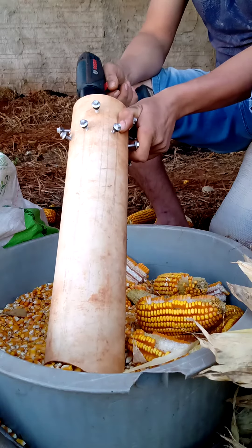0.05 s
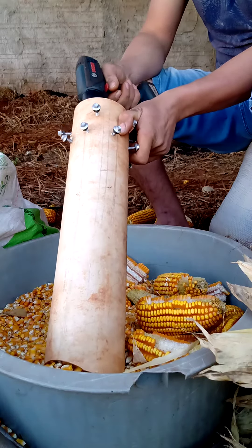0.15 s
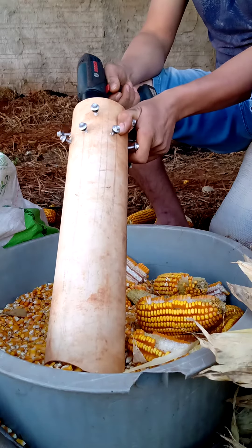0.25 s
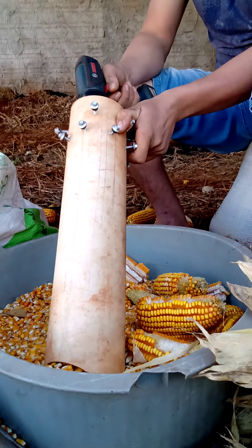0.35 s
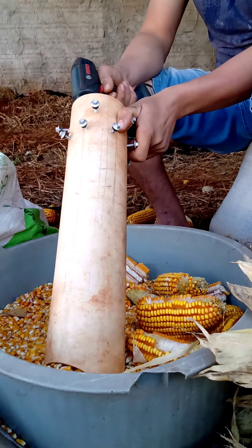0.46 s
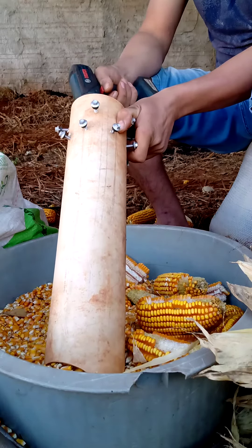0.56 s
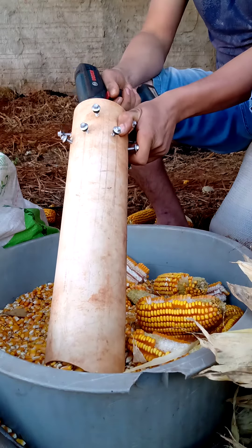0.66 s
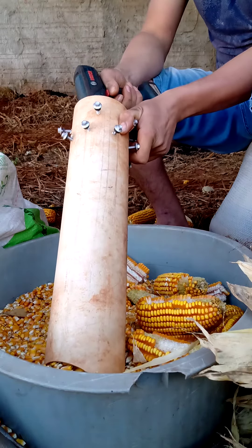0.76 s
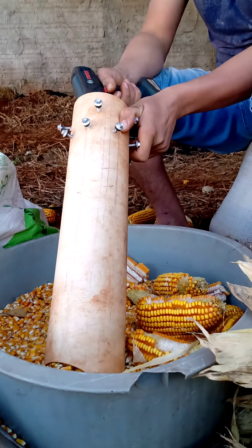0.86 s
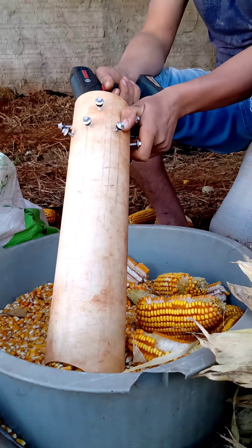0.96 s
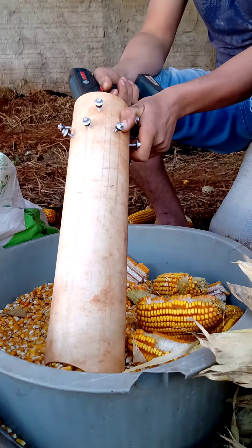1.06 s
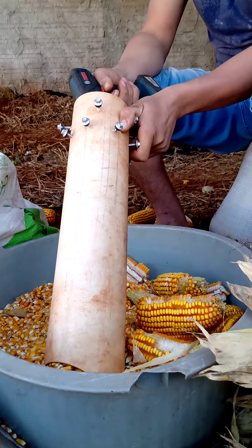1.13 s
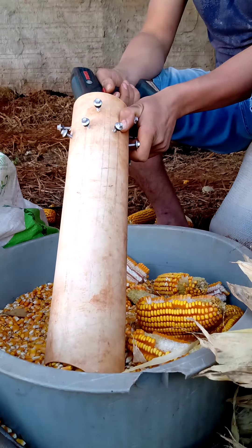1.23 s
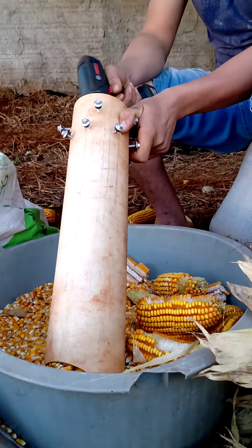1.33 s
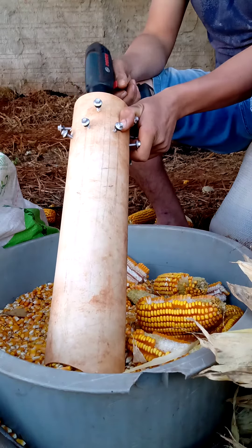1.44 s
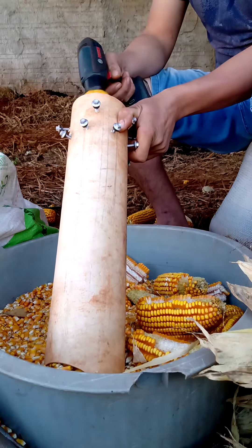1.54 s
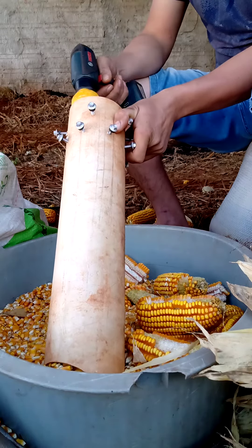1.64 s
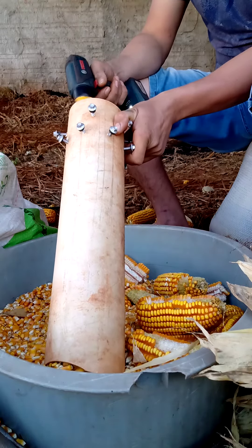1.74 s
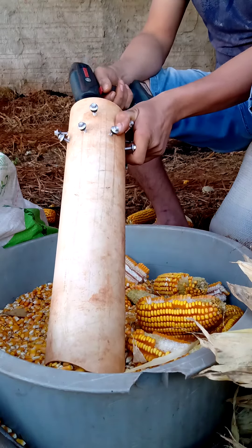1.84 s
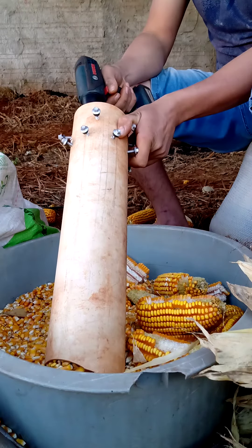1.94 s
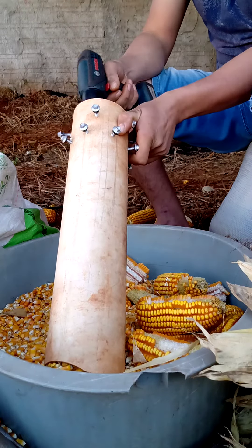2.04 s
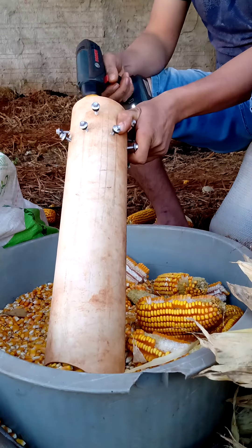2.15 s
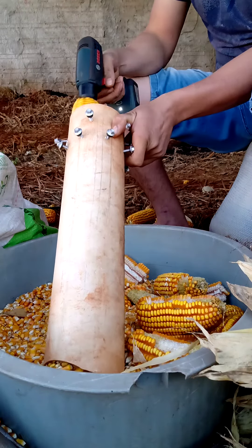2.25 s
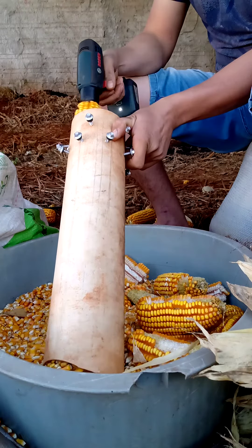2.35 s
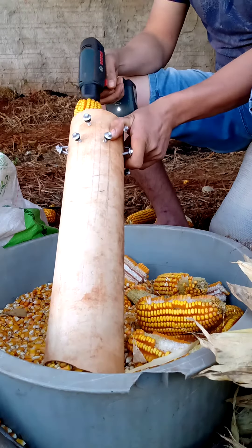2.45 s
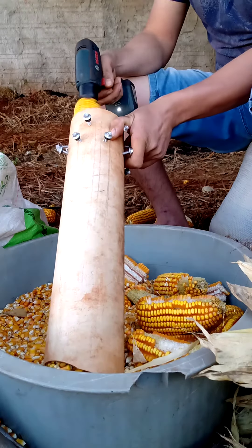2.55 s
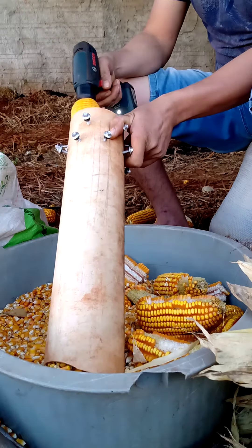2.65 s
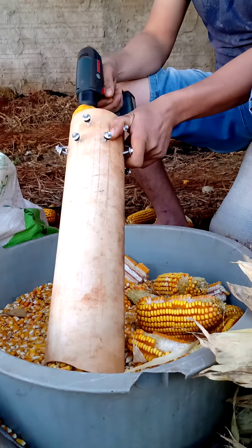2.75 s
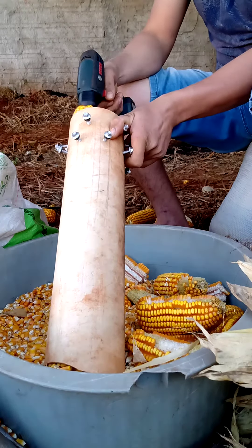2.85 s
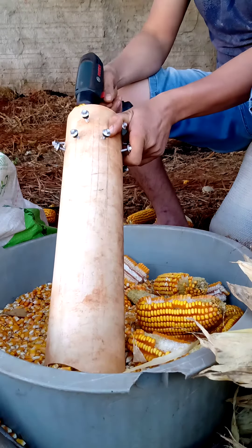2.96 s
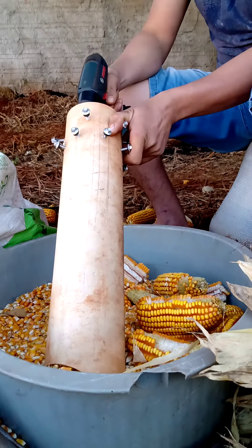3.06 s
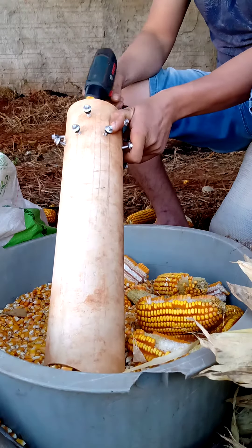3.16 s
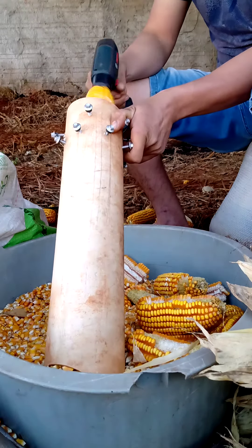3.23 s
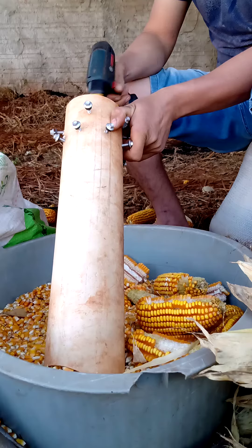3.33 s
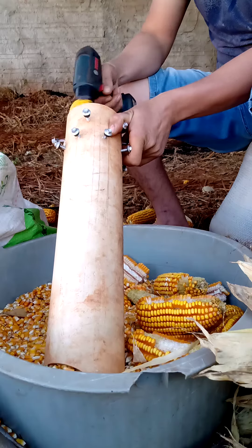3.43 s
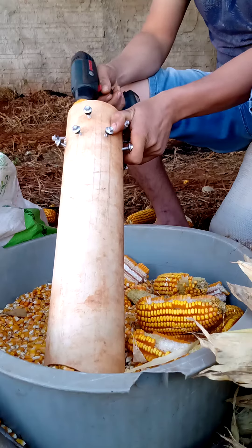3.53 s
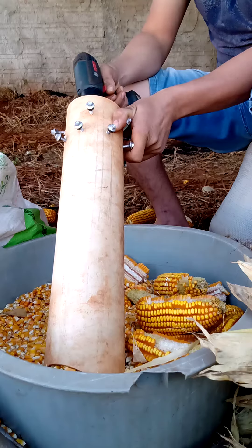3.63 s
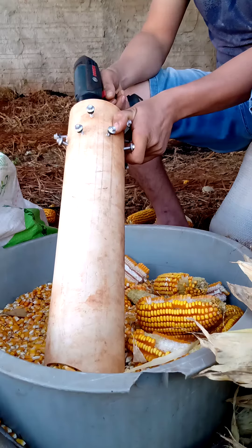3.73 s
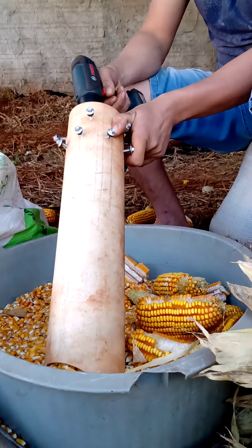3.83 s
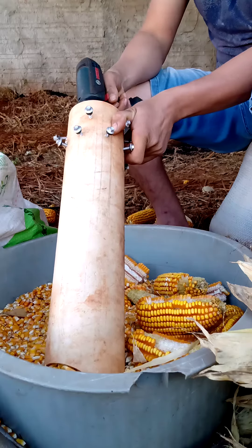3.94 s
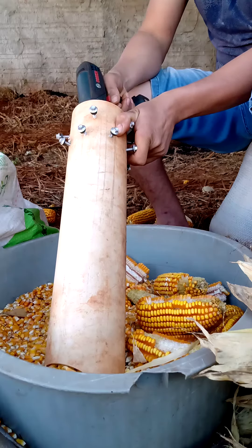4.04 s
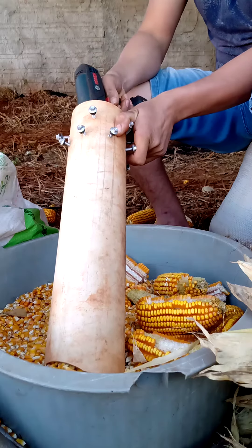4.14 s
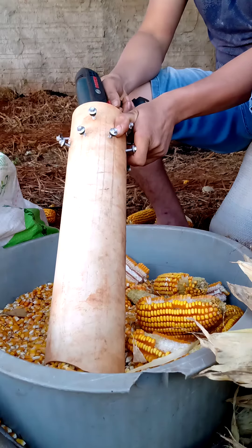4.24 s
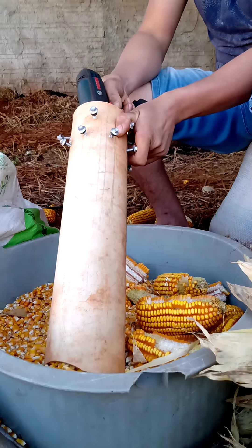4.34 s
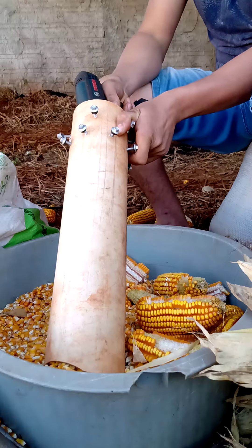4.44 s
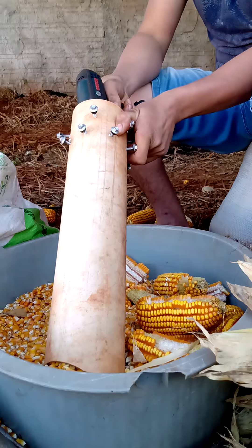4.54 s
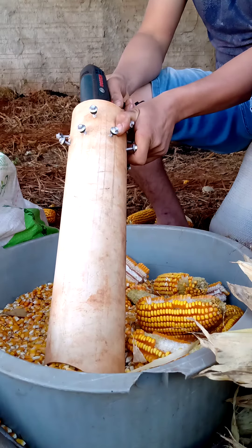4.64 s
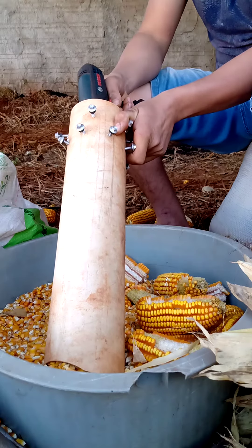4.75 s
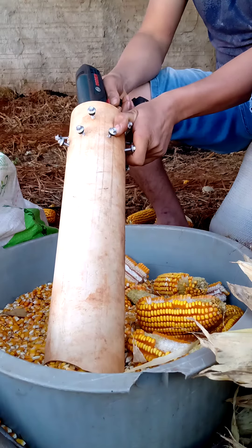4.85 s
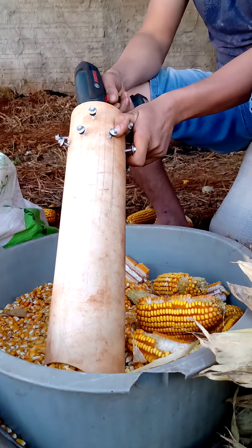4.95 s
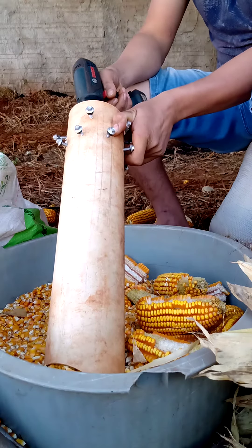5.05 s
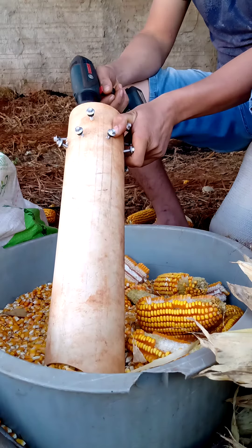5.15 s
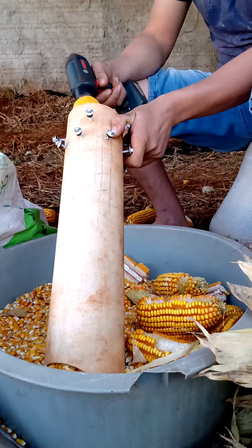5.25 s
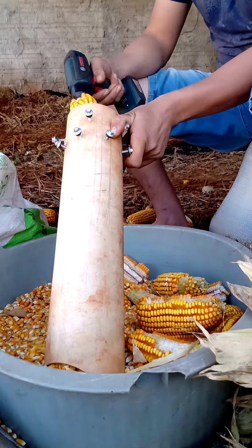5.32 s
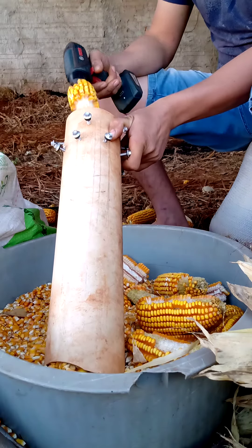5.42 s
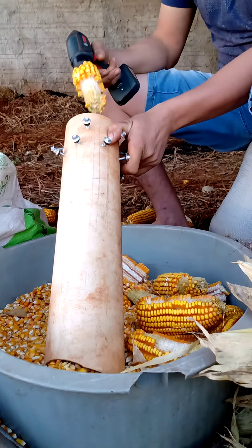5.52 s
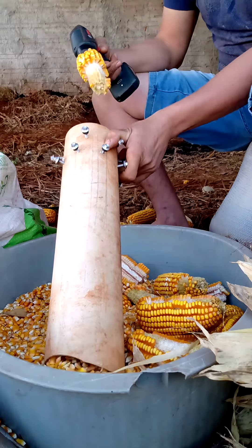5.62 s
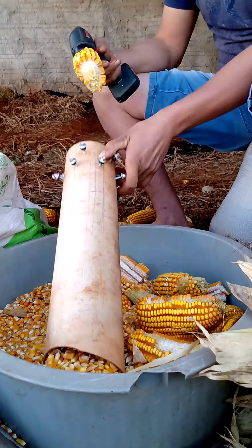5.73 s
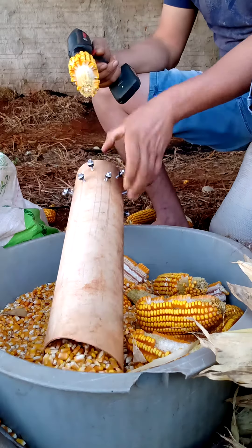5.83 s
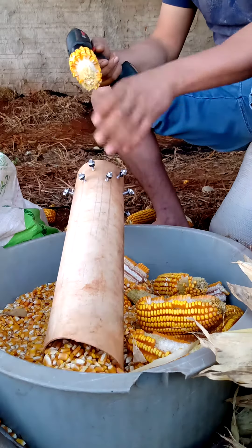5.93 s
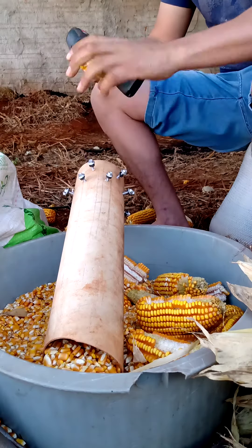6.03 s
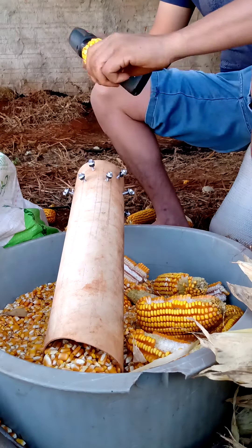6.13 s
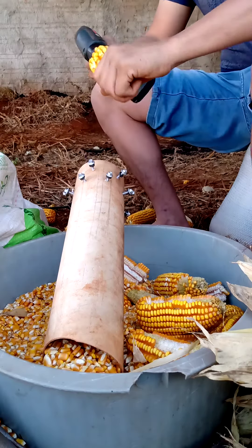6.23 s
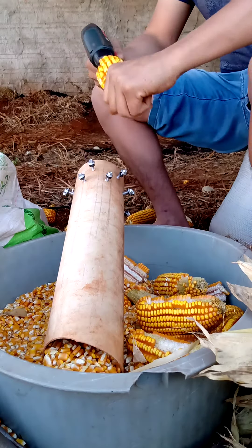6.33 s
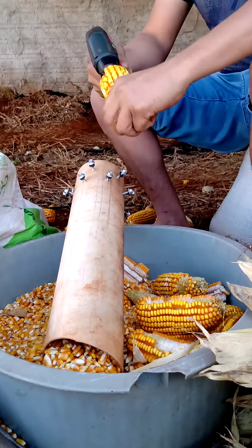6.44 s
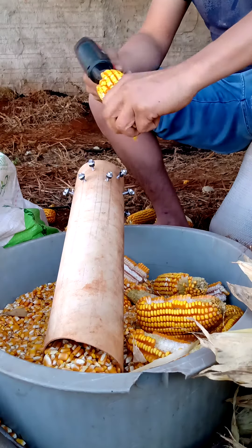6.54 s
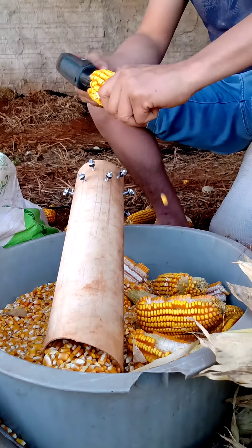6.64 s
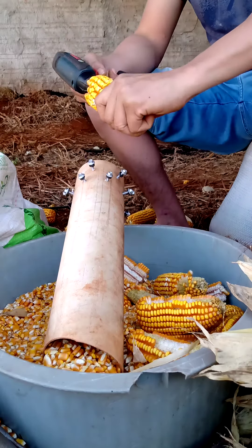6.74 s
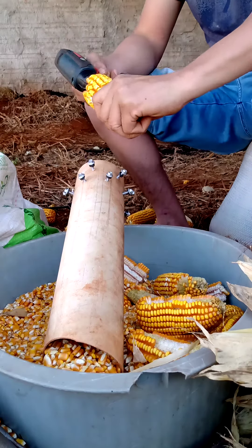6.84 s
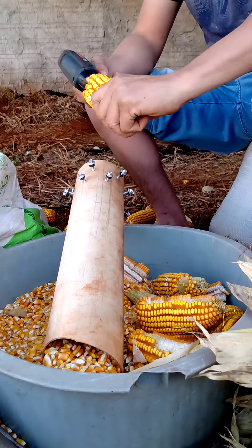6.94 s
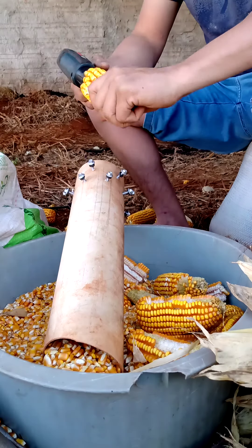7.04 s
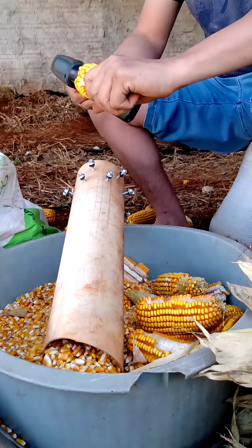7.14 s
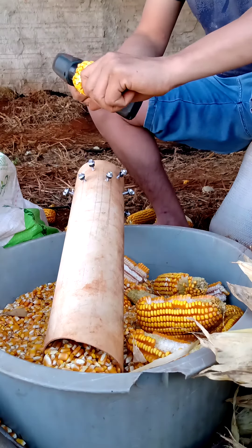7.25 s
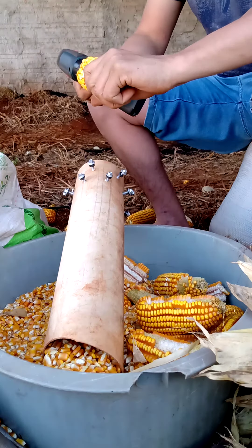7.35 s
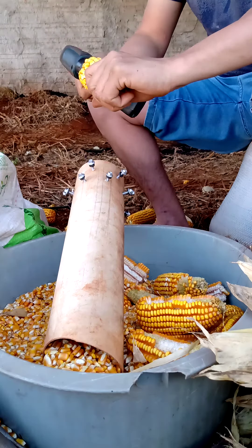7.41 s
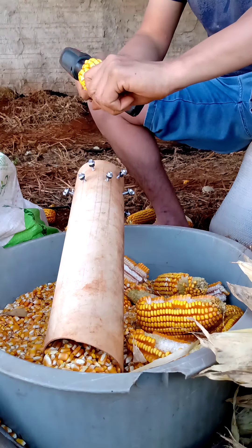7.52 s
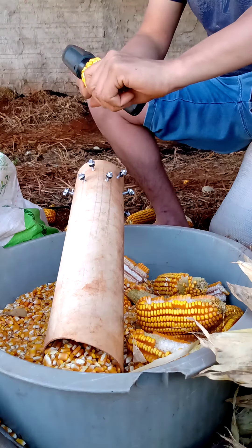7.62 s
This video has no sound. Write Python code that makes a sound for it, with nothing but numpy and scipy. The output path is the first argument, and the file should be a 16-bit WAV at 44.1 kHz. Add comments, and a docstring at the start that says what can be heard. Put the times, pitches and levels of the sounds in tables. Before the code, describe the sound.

Kernels snap and clatter against bolts under a high motor whirr, then the motor cuts, a pipe thumps down, and handling clicks lead to a restart.

```python
"""A motor whirrs and whines while kernels crack and rattle: a drill spins an ear of corn in a bolted pipe.
The motor is shaped noise with sine tones; torn kernels and pipe are resonators struck by impulses.
The drill stops, the pipe drops into a tub of damped modes, and short noise bursts tick and click.
The motor then starts again with gliding tones; a faint outdoor hush of coloured noise lies beneath."""
import sys
import numpy as np
from scipy import signal
from scipy.fft import rfft, irfft
from scipy.io import wavfile

SR = 44100
rng = np.random.default_rng(int(sys.argv[2]) if len(sys.argv) > 2 else 0)


def dump(signal):
    """Clip the signal to [-1, 1] and save it as 16-bit WAV at the path in sys.argv[1]."""
    limited = np.clip(np.atleast_2d(signal).T, -1, 1)
    pcm = np.round(limited * 32767).astype(np.int16)
    wavfile.write(sys.argv[1], SR, pcm)


N = 338688


def from_db(db):
    """Decibel law: 20 dB is a tenfold change of amplitude."""
    return 10 ** (np.asarray(db) / 20)


def rms_one(x):
    """Normalisation: unit root-mean-square amplitude."""
    return x / np.sqrt(np.mean(x ** 2) + 1e-20)


def in_time(rows, outside=None):
    """Linear interpolation: the columns of a table become curves over all samples."""
    seconds, *columns = np.transpose(rows)
    t = np.arange(N) / SR
    return [np.interp(t, seconds, column, outside, outside) for column in columns]


def at_hz(points):
    """Log-frequency interpolation: a spectrum table is read on the FFT grid."""
    table_hz, values = np.array(points).T
    grid_hz = np.maximum(np.arange(N // 2 + 1) * SR / N, 1)
    return np.interp(np.log(grid_hz), np.log(table_hz), values)


def colour(x, spectrum):
    """Spectral filtering: each frequency is weighted by a table of dB against Hz."""
    return irfft(rfft(x) * from_db(at_hz(spectrum)), N)


def drift(rate_hz):
    """Low-passed random process: a slow wander of rms 1."""
    r = np.exp(-2 * np.pi * rate_hz / SR)
    noise = rng.standard_normal(N + SR)
    settled = signal.lfilter([1], [1, -2 * r, r * r], noise)[SR:]
    return rms_one(settled)


def linger(x, seconds):
    """Exponential relaxation: each impulse dies away with this time constant."""
    return signal.lfilter([1], [1, -np.exp(-1 / (seconds * SR))], x)


def resonate(x, hz, width_hz):
    """Damped resonance: a unit click rings at one frequency with height 1."""
    r, w = np.exp(-np.pi * width_hz / SR), 2 * np.pi * hz / SR
    return signal.lfilter([1, -1], [1, -2 * r * np.cos(w), r * r], x + 1e-18) * np.cos(w / 2)


def body(impulses, modes, spread_db):
    """Modal excitation: each click drives each mode unevenly, and the balance wanders with the contact."""
    out = 0
    for k, (hz, width_hz, db) in enumerate(modes):
        drive_db = db + spread_db * rng.standard_normal(N) + 1.5 * drift(30.)
        out = out + (-1) ** k * resonate(impulses * from_db(drive_db), hz, width_hz)
    return out


# Kernel sizes. Each entry: resonance frequency and width as a ratio to the mode table.
SIZE_RATIOS = (.94, 1., 1.07)


def kernels(impulses, spread_db, modes):
    """Size scaling of resonance: every few ms another size is drawn, ringing higher or lower."""
    size = np.repeat(rng.integers(0, len(SIZE_RATIOS), N // 128 + 1), 128)[:N]
    out = 0
    for k, ratio in enumerate(SIZE_RATIOS):
        scaled_modes = np.multiply(modes, [ratio, ratio, 1])
        out = out + body(impulses * (size == k), scaled_modes, spread_db)
    return out


def grains(per_s, spread_db):
    """Poisson-like impacts: random instants, either sign, exponentially spread dB levels."""
    sizes = from_db(spread_db * np.minimum(rng.exponential(1, N), 3)) * rng.choice([-1, 1], N)
    return sizes * (rng.random(N) < per_s / SR)


def train(times, levels_db):
    """Impulse train: one-sample clicks at given times."""
    out = np.zeros(N)
    out[np.round(np.array(times) * SR).astype(int)] = from_db(levels_db)
    return out


# Drill speed, sagging when the ear is pressed hard. Each row: time in seconds, nominal whine in Hz.
DRILL_SPEED = [(0, 4810), (.3, 4800), (.38, 4700), (.9, 4710), (1.2, 4690), (1.42, 4730), (1.47, 4600),
               (1.53, 4050), (1.8, 3300), (2.05, 4400), (2.2, 4790), (2.4, 4710), (2.66, 4710), (2.8, 4330),
               (2.93, 4640), (3.1, 4690), (3.25, 4770), (3.3, 4620), (3.43, 4100), (3.53, 3600),
               (3.63, 4420), (3.68, 4650), (3.75, 4760), (4.6, 4755), (5.15, 4800), (5.36, 4150)]
# Motor whirr strength. Each row: time in seconds, relative level in dB.
WHIRR_LEVEL = [(0, -38.5), (.16, -39.5), (1.01, -42), (1.39, -40.5), (1.75, -38.5), (1.99, -40),
               (2.17, -37.5), (2.53, -38), (3.22, -40), (3.5, -39.5), (3.83, -40.5), (5.34, -40)]
# Brush and fan noise spectrum. Each row: frequency in Hz, relative density in dB per Hz.
MOTOR_SPECTRUM = [(100, -48), (650, -17.5), (1150, -12), (1420, -14.5), (2450, -7), (2800, -14.5),
                  (3500, -5), (4300, -8), (5500, -7), (6500, -5), (7700, -6), (9900, -3.5), (10350, 2),
                  (10750, -4), (11600, -16), (13500, -21), (15500, -23.5)]
# Fainter rotor tones. Each entry: multiple of the turning rate, relative level in dB.
ROTOR_ORDERS = {3: -59.5, 6: -62.5}
# A faint squeak under the fingers, then the tones of the restart. Each row: start in seconds,
# loudest time in seconds, starting pitch in Hz, glide in Hz per s, relative top level in dB,
# slope in dB per s on both sides of the loudest time.
GLIDING_TONES = [(7.24, 7.257, 2680, -500, -68, 249), (7.425, 7.457, 7900, 1201.5, -67, 131.5),
                 (7.466, 7.488, 2400, 5, -63, 150), (7.576, 7.638, 652, 1005, -50, 192)]
STOP_S, STOP_DB_PER_S = 5.34, 612  # the trigger is let go
# Relative whirr level and its rise before and after the motor catches
RESTART_S, RESTART_DB, CATCH_DB_PER_S, RUN_UP_DB_PER_S = 7.52, -51, 364, 100
RESTART_DULL_HZ = 4030  # the slow motor has little treble yet
HOUSING_HZ, HOUSING_WIDTH_HZ = 4690, 85  # the housing favours the whine near this pitch
WHINE_DB, OCTAVE_DB = -42.5, -43  # relative
OCTAVE_FADE_DB = 10  # lost by the octave once the speed sags by 12 %
LABOUR_DULLS = 2.9  # share of whirr dulled per share of speed lost
SEGMENTS = 12  # whine cycles per rotor turn


def drill():
    """Rotating-machine sound: fluttering brush and fan noise, plus tones locked to the rotor phase."""
    t = np.arange(N) / SR
    hz, = in_time(DRILL_SPEED)
    running_db, = in_time(WHIRR_LEVEL)
    stop_db = -STOP_DB_PER_S * np.maximum(t - STOP_S, 0)
    since = t - RESTART_S
    restart_db = RESTART_DB + np.where(since < 0, CATCH_DB_PER_S, RUN_UP_DB_PER_S) * since

    flutter = from_db(4.0 + 1.0 * drift(63.0))
    whirr = flutter * rms_one(colour(rng.standard_normal(N), MOTOR_SPECTRUM))
    dull = signal.lfilter(*signal.butter(1, RESTART_DULL_HZ, fs=SR), whirr)
    labour = np.clip(LABOUR_DULLS * (1 - hz / HOUSING_HZ), 0, 1)
    out = from_db(running_db + stop_db) * (whirr + labour * (dull - whirr))
    out += from_db(restart_db) * dull

    whine_cycles = np.cumsum(hz + 2.5 * drift(30.)) / SR
    whine = from_db(WHINE_DB) / np.hypot(1, ((hz - HOUSING_HZ) / HOUSING_WIDTH_HZ) ** 2)
    sag = (HOUSING_HZ - hz) / (.12 * HOUSING_HZ)
    octave = from_db(OCTAVE_DB - OCTAVE_FADE_DB * sag ** 4)
    tones = 0
    for k, gain in enumerate([whine, octave]):
        waver = from_db(stop_db + (1.5 + k) * drift(8.))
        tones += gain * waver * np.sin(2 * np.pi * (k + 1) * whine_cycles)

    for order, db in ROTOR_ORDERS.items():
        gain = octave / octave.max() * from_db(db + stop_db + 4.1 * drift(14.3))
        out += gain * np.sin(2 * np.pi * order * whine_cycles / SEGMENTS)

    for start, loudest, start_hz, glide, db, slope in GLIDING_TONES:
        on = np.maximum(t - start, 0)
        gain = from_db(db - slope * np.abs(t - loudest) + 4.9 * drift(56.0)) * (on > 0)
        out += gain * np.sin(2 * np.pi * (start_hz + glide * on / 2) * on)
    return out, tones


# Ear resting on the bolts. Each row: time in seconds, relative kernel rattle in dB,
# relative pipe rumble in dB.
RESTING_CONTACT = [(0, -24.5, -43.5), (.45, -35.5, -50), (.93, -34.5, -39), (1.03, -39.5, -61),
                   (1.32, -54, -59), (1.36, -34, -47), (1.6, -49.5, -60.5), (2.05, -28.5, -50.5),
                   (2.5, -56, -71), (2.63, -35, -46.5), (2.96, -50.5, -62.5), (3.55, -43, -54),
                   (4.0, -36.5, -46), (4.25, -37, -48.5), (4.4, -62, -58), (4.9, -48, -57), (5.3, -46, -62),
                   (5.38, -59, -90), (5.7, -66, -75)]
# Bolts biting into a row of kernels. Each row: middle in seconds, length in seconds over which
# the bite dies away by about 20 dB, relative kernel rattle in dB, relative pipe rumble in dB.
BOLT_BITES = [(0.112, 0.088, -27, -51), (0.219, 0.08, -21, -34), (0.32, 0.022, -34.5, -57),
              (0.374, 0.049, -21.5, -41.5), (0.43, 0.022, -31.5, -39), (0.536, 0.018, -24, -31.5),
              (0.602, 0.082, -26.5, -31), (0.708, 0.058, -29, -36.5), (0.801, 0.012, -22, -36),
              (0.91, 0.11, -33.5, -37), (1.373, 0.066, -28.5, -40.5), (1.449, 0.043, -24.5, -41.5),
              (1.526, 0.064, -26, -62), (1.594, 0.02, -27.5, -56), (1.632, 0.019, -33, -50),
              (1.72, 0.019, -39, -70.5), (1.742, 0.01, -29, -56), (1.775, 0.024, -49, -55.5),
              (1.863, 0.011, -24.5, -51), (2.007, 0.024, -28, -45.5), (2.103, 0.083, -23.5, -44.5),
              (2.214, 0.015, -25, -53), (2.26, 0.097, -32.5, -47.5), (2.356, 0.039, -27, -43.5),
              (2.414, 0.021, -34.5, -51), (2.59, 0.049, -29.5, -48.5), (2.671, 0.017, -32, -60),
              (2.733, 0.034, -33, -48), (3.3, 0.017, -23, -56), (3.375, 0.046, -26, -46),
              (3.475, 0.022, -29, -45.5), (3.537, 0.052, -28.5, -44), (3.67, 0.045, -22, -37.5),
              (3.769, 0.095, -28.5, -38.5), (3.812, 0.012, -19, -34.5), (3.899, 0.047, -21.5, -38),
              (3.995, 0.045, -24, -35), (4.148, 0.04, -24.5, -41.5), (4.296, 0.024, -32, -37),
              (4.438, 0.05, -28.5, -39.5), (4.523, 0.013, -34.5, -66), (4.605, 0.11, -26, -44),
              (4.695, 0.024, -27.5, -38.5), (4.912, 0.025, -29.5, -35.5), (5.015, 0.064, -30.5, -40),
              (5.124, 0.048, -26.5, -45.5), (5.203, 0.034, -29.5, -53.5), (5.313, 0.024, -33, -46)]
BITE_SHARPNESS = 4.64  # how quickly a bite swells and dies against its length
BITE_ATTACK = 0.88  # length of the swell as a share of the dying away


def pressure():
    """Addition of powers: resting contact plus a bell-shaped swell for each bite."""
    t = np.arange(N) / SR
    power = from_db(in_time(RESTING_CONTACT, -200)) ** 2
    for middle, length, *db in BOLT_BITES:
        first = max(round((middle - 2 * length) * SR), 0)
        near = slice(first, round((middle + 2 * length) * SR))
        side_length = length * np.where(t[near] < middle, BITE_ATTACK, 1)
        swell = np.exp(-BITE_SHARPNESS * ((t[near] - middle) / side_length) ** 2)
        power[:, near] += from_db(db)[:, None] ** 2 * swell
    return np.sqrt(power)


# Loudest kernels snapping off. Each row: time in seconds, relative strength in dB.
KERNEL_SNAPS = [(0.0543, -16), (0.0844, -16.5), (0.106, -13), (0.1225, -6), (0.1429, -9), (0.176, -14),
                (0.213, -11.5), (0.2256, -25), (0.2411, -10), (0.2653, -15), (0.299, -8.5), (0.3203, -8.5),
                (0.364, -15.5), (0.381, -4), (0.4268, -9), (0.4577, -14), (0.5166, -11), (0.5305, -7.5),
                (0.549, -12.5), (0.586, -6.5), (0.5942, -8.5), (0.631, -16), (0.681, -12), (0.701, -11.5),
                (0.711, -10.5), (0.784, -10), (0.7907, -14), (0.7976, -12), (0.8453, -17.5), (0.884, -17),
                (0.901, -16), (1.4295, -19.5), (1.4529, -16.5), (1.502, -9), (1.5216, -7.5), (1.547, -5.5),
                (1.6225, -26), (1.6507, -17.5), (1.684, -18), (1.741, -6.5), (1.775, -20), (1.8382, -11),
                (1.858, -16.5), (1.9131, -14), (1.966, -13), (1.994, -15.5), (2.013, -21.5), (2.1002, -6.5),
                (2.1258, -14), (2.3496, -17.5), (2.4086, -17), (3.2641, -12), (3.2723, -17), (3.304, -24),
                (3.313, -25), (3.3694, -11), (3.3952, -22), (3.4304, -15), (3.5175, -12), (3.531, -10),
                (3.5917, -32), (3.6173, -13.5), (3.6371, -13), (3.666, -15.5), (3.6966, -19.5),
                (3.7695, -13), (3.81, -11.5), (3.8886, -14.5), (3.912, -11.5), (3.9351, -10), (3.966, -15),
                (3.9783, -2.5), (3.9862, -12.5), (3.9934, -7.5), (4.032, -14.5), (4.0665, -15),
                (4.119, -13), (4.1224, -8.5), (4.1362, -11), (4.1392, -8.5), (4.162, -11), (4.2256, -23),
                (4.4228, -9.5), (4.5211, -16), (4.5714, -12), (4.698, -25.5), (4.9052, -15.5),
                (5.009, -15.5), (5.0212, -5.5), (5.028, -17.5), (5.034, -8.5), (5.101, -15), (5.1094, -14),
                (5.1174, -13), (5.1794, -24), (5.2033, -17.5), (5.219, -14.5), (5.2878, -19.5),
                (5.319, -11.5)]
# Cob knocking the pipe wall. Each row: time in seconds, relative strength in dB.
COB_KNOCKS = [(0.029, -25), (0.076, -30.5), (0.185, -47.5), (0.327, -26), (0.421, -35), (0.531, -29),
              (0.566, -23.5), (0.707, -17.5), (0.795, -20.5), (0.857, -21), (0.909, -22), (1.351, -27.5),
              (1.733, -47.5), (3.655, -41), (3.747, -33), (3.884, -35), (3.954, -24.5), (4.113, -22),
              (4.152, -18.5), (4.189, -24), (4.228, -28), (4.28, -24.5), (4.616, -28.5), (4.688, -50.5),
              (4.833, -32.5), (4.901, -33)]
# Kernel resonances before size scaling. Each row: frequency in Hz, width in Hz, relative level in dB.
KERNEL_MODES = [(1658, 106, -18.5), (2440, 188, -10), (2938, 240, -7), (3490, 935, 1.5), (4570, 520, 3.5),
                (5280, 960, 2), (6690, 910, -3), (8900, 1400, -6.5), (11200, 720, -14)]
# Pipe resonances, also scaled by size in the rumble. Each row: frequency in Hz, width in Hz,
# relative level in dB.
PIPE_MODES = [(153, 98, -4.5), (256.7, 43.3, -6), (465.4, 42, -1.5), (667.5, 39, 1.5), (847, 150, 5.5),
              (1195, 98, 2)]
STRAY_SNAPS_PER_S, STRAY_SNAP_DB = 120, 1.5  # at random; strength against the rattle curve


def shelling():
    """Impact excitation: torn kernels rattle and splinter, the cob judders and the pipe booms along."""
    rattling, rumbling = pressure()
    snaps = train(*np.transpose(KERNEL_SNAPS))
    stray = np.abs(grains(STRAY_SNAPS_PER_S, spread_db=3.5))
    snaps += from_db(STRAY_SNAP_DB) * rattling * (np.arange(N) < STOP_S * SR) * stray

    # Each snap drags a dense splintering and a longer, sparser tumble behind it
    splinters = linger(snaps, .0009) * rng.standard_normal(N)
    tumble = linger(snaps, .008) * grains(1500.0, spread_db=4.0)
    snaps = snaps + 0.3 * splinters + 0.13 * tumble

    rattle_hits = grains(1500 * from_db(2.5 * drift(40.)), spread_db=5.5)
    rattle = rms_one(kernels(rattle_hits, 4.0, KERNEL_MODES))
    rumble_hits = grains(300 * from_db(2.5 * drift(20.)), spread_db=5.0)
    rumble = rms_one(kernels(rumble_hits, 4.0, PIPE_MODES))

    knocks = train(*np.transpose(COB_KNOCKS))
    judder = linger(knocks, 0.01) * grains(600.0, spread_db=3.0)
    kernel_ring = kernels(snaps + 1.2 * (knocks + judder), 2.5, KERNEL_MODES)
    pipe_ring = body(knocks + 0.35 * judder + 0.032 * snaps, PIPE_MODES, 2.5)
    return (from_db(-4.0) * rattling * rattle + from_db(-1.0) * rumbling * rumble
            + from_db(-9.0) * kernel_ring + from_db(-12.0) * pipe_ring)


# Outdoor hush. Each row: frequency in Hz, relative density in dB per Hz.
YARD_SPECTRUM = [(18, -37), (30, 4), (194, -12), (449, -17.5), (540, -12.5), (801, -16), (866, -13.5),
                 (1540, -22.5), (2800, -22.5), (8000, -28.5), (16000, -38.5)]


def yard():
    """Diffuse-field coherence: hush alike at both ports only in the bass, its treble faintly rustling."""
    shared, left, right = (colour(rng.standard_normal(N), YARD_SPECTRUM) for _ in range(3))
    low = signal.lfilter(*signal.butter(1, 450, fs=SR), [shared - left, shared - right])
    hush = low + [left, right]
    treble = signal.lfilter(*signal.butter(1, 2000, "high", fs=SR), hush)
    rustle = from_db(3.4 * drift(7.) + 3.0)
    return from_db(-60.5) * rms_one(hush + treble * (rustle - 1))


# Short clicks: stray ticks, the crack of the landing, handling clicks, the motor's start.
# Each row: time in seconds, relative level in dB, centre in Hz, time in seconds for the main
# burst to fall by 60 dB.
SHORT_CLICKS = [(5.393, -43, 4630, 0.018), (5.419, -46, 4510, 0.012), (5.4427, -47, 4530, 0.012),
                (5.448, -47, 4460, 0.012), (5.462, -49, 4460, 0.012), (5.4766, -43, 4470, 0.02),
                (5.4955, -45, 4200, 0.012), (5.513, -46, 4300, 0.02), (5.5499, -50, 4220, 0.012),
                (5.576, -37.5, 4500, 0.018), (5.6185, -36, 4660, 0.025), (5.663, -44.5, 5570, 0.025),
                (5.78, -57, 5500, 0.05), (5.8365, -22, 2650, 0.02), (5.842, -29, 1499, 0.033),
                (5.8473, -24, 2340, 0.05), (5.9094, -51, 2760, 0.025), (6.1391, -47, 3040, 0.026),
                (6.1553, -41.5, 9600, 0.037), (6.216, -54, 4000, 0.02), (6.25, -58, 4000, 0.02),
                (6.7327, -40.5, 6900, 0.025), (6.761, -52, 8350, 0.027), (6.796, -51, 7940, 0.025),
                (6.92, -50.5, 4780, 0.024), (6.954, -56, 3780, 0.025), (6.998, -56, 2400, 0.03),
                (7.1015, -49.5, 4070, 0.027), (7.112, -57, 4000, 0.066), (7.1545, -22, 7200, 0.015),
                (7.155, -21, 2900, 0.028), (7.1633, -36, 3510, 0.045), (7.295, -66, 3230, 0.02),
                (7.34, -59.5, 5760, 0.02), (7.504, -28.5, 4660, 0.032), (7.5143, -37, 4540, 0.06)]


def clicks():
    """Transient noise: a sharp burst with a weaker, longer tail, bright around its centre."""
    t = np.arange(SR // 8) / SR
    out = np.zeros(N + len(t))
    wide = signal.butter(3, [1100, 9500], "band", fs=SR, output="sos")
    for s, db, hz, t60 in SHORT_CLICKS:
        decay = from_db(-60 * t / t60) + .07 * from_db(-60 * t / (5 * t60))
        noise = rng.standard_normal(len(t)) * decay
        burst = signal.sosfilt(wide, noise) + .6 * resonate(noise, hz, .35 * hz)
        loudness = np.sqrt(np.sum(burst ** 2) / (0.1 * t60 * SR))
        out[round(s * SR):][:len(t)] += from_db(db) * burst / loudness
    return 0.46 * out[:N]


# Pipe landing in the tub, bounces and a soft bump. Each row: time in seconds,
# relative strength in dB, contact cut-off in Hz.
TUB_BLOWS = [(5.837, 8.5, 1700), (5.877, -30.5, 498), (5.91, -33, 1200), (5.952, -38, 350),
             (5.976, -37.5, 340), (6.006, -45, 355), (6.82, -30.5, 110), (6.865, -38, 129.4),
             (6.906, -41, 130)]
# Tub modes. Each row: frequency in Hz, relative level in dB, time in seconds to fall by 60 dB.
TUB_MODES = [(114, -8.5, 0.072), (171, -20, 0.043), (258, 6, 0.034), (297, -5.5, 0.039), (420, 5, 0.031),
             (635, 5, 0.015), (1102, -14, 0.0113), (1880, -3, 0.011), (2560, 11, 0.0152)]
FIRM_HZ = 1200  # contacts softer than this shake the tub's load more


def thuds():
    """Contact-time filtering: softer blows ring the tub duller, and shifting kernels keep it shaking."""
    push = np.zeros(N)
    for s, db, hz in TUB_BLOWS:
        blow = train([s], [db])
        shaking = linger(blow, 0.032) * rng.standard_normal(N)
        force = -blow + 0.014 * np.sqrt(FIRM_HZ / hz) * shaking + 1e-18
        softness = signal.butter(4, hz, fs=SR, output="sos")
        push += signal.sosfilt(softness, force) * SR / (8 * hz)
    push = signal.lfilter(*signal.butter(3, 75, "high", fs=SR), push)
    out = 0
    for hz, db, t60 in TUB_MODES:
        width_hz = np.log(1000) / (np.pi * t60)
        out = out + from_db(db - 36.5) * resonate(push, hz, width_hz)
    return out


# Left port against right, shaded by the phone body. Each row: frequency in Hz, level in dB.
LEFT_SHADE = [(100, -1), (400, -1.5), (700, -1.5), (1200, -11), (1600, -6), (2200, -10), (2550, 0.5),
              (3100, -7), (4500, 4), (6500, -1), (8000, -6.5), (9500, -18), (10600, -10), (11500, -22),
              (15000, -17)]
# Left sound that came by other paths. Each row: frequency in Hz, share of power from 0 to 1.
SCATTERED_SHARE = [(100, .03), (400, .15), (700, .3), (1200, .75), (2500, .6), (4700, .6), (7500, .95),
                   (10400, .95), (12000, .98)]
LEFT_LAG = 22  # samples


def two_ports(x, steady):
    """Delay, shadow and scattering: the left hears x late by wavering paths; the steady part comes straight."""
    late = np.concatenate([np.zeros(LEFT_LAG), x[:-LEFT_LAG]])
    path_t = np.arange(SR // 20) / SR
    paths = rng.standard_normal((10, len(path_t))) * from_db(-60 * path_t / 0.028)
    paths /= np.sqrt(np.sum(paths ** 2))
    # Each path wanders in strength at random, so the left port's balance keeps shifting
    scattered = sum(rfft(late * drift(7.)) * rfft(path, N) for path in paths)
    share = np.clip(at_hz(SCATTERED_SHARE), 0, 1)
    left = np.sqrt(1 - share) * rfft(late) + np.sqrt(share) * scattered
    left = left + rfft(np.roll(steady, LEFT_LAG))
    return np.array([irfft(left * from_db(at_hz(LEFT_SHADE)), N), x + steady])


def scene():
    """Superposition: all sources add at both ports."""
    whirr, whine = drill()
    near = whirr + shelling() + clicks() + thuds()
    return from_db(4.5) * two_ports(near, whine) + yard()


MIC_LOW_HZ, TOP_HZ = 89, 16600  # bass corner; stop-band edge of the treble cut
OVERLOAD = .9  # ceiling of the rounded peaks


def record(dry):
    """Band-limiting and saturation: small microphones lose deep bass, round peaks and cut the top."""
    thin = signal.sosfilt(signal.butter(2, MIC_LOW_HZ, "high", fs=SR, output="sos"), dry)
    rounded = OVERLOAD * np.tanh(thin / OVERLOAD)
    return signal.sosfilt(signal.cheby2(12, 70, TOP_HZ, fs=SR, output="sos"), rounded)


dry = scene()
out = record(dry)
dump(out)
```